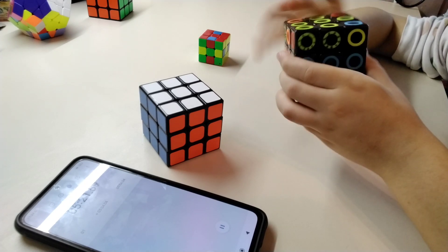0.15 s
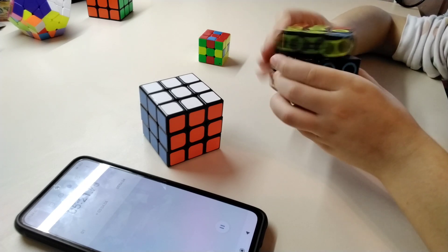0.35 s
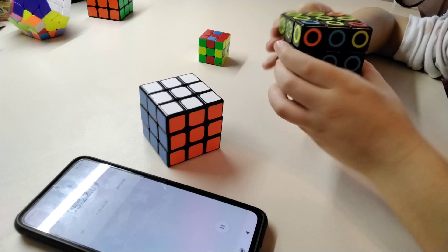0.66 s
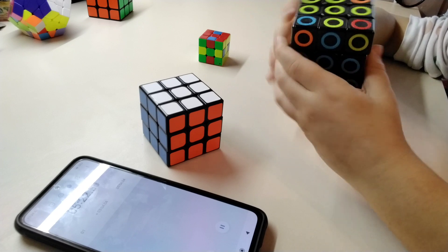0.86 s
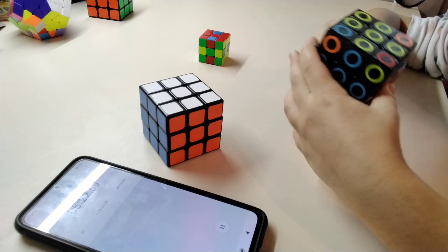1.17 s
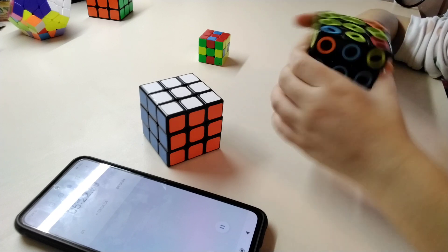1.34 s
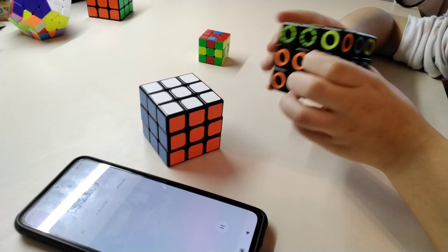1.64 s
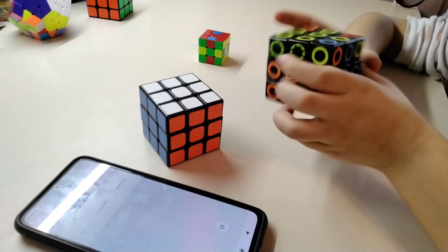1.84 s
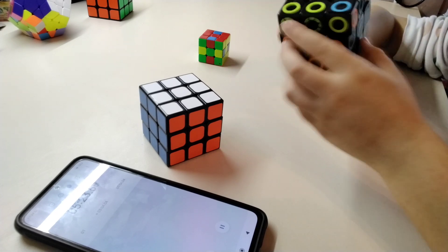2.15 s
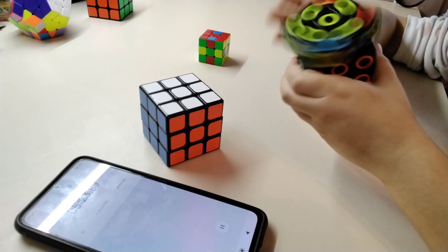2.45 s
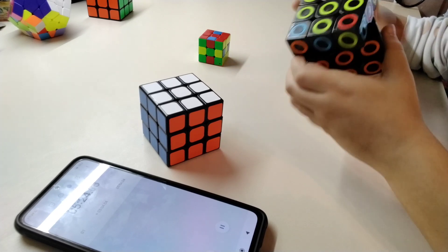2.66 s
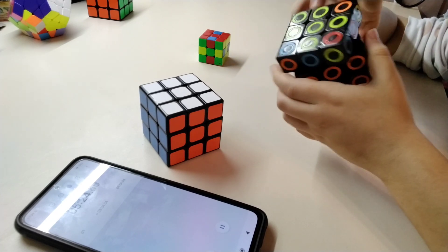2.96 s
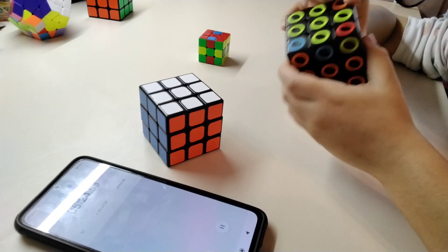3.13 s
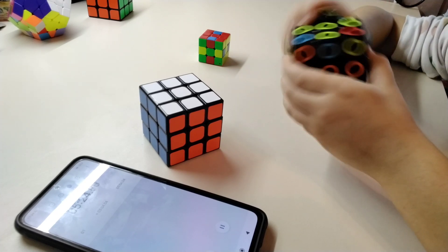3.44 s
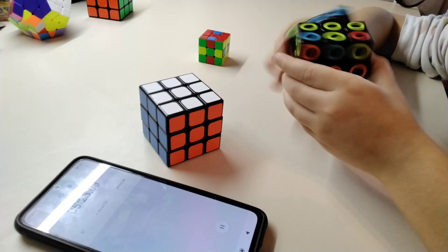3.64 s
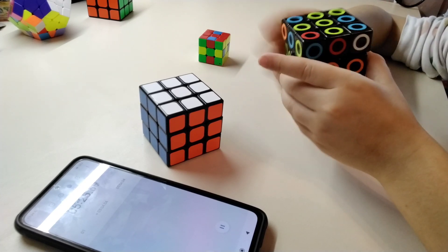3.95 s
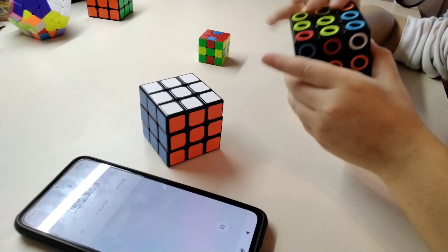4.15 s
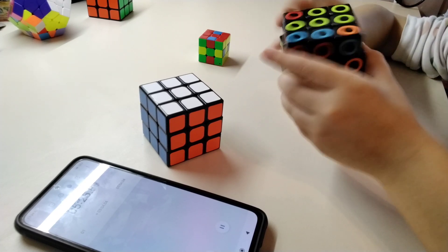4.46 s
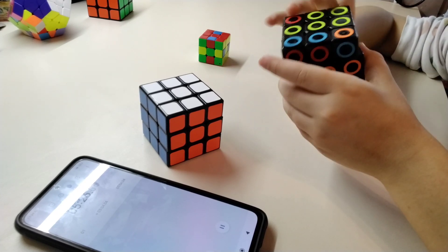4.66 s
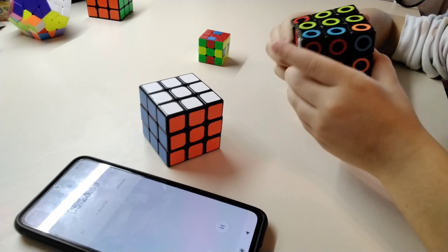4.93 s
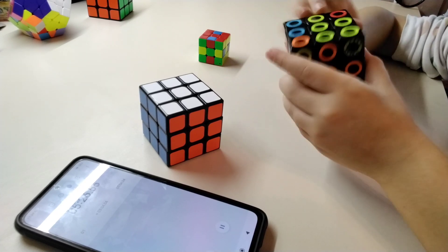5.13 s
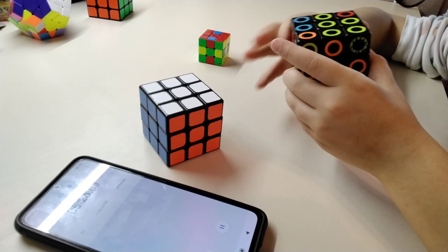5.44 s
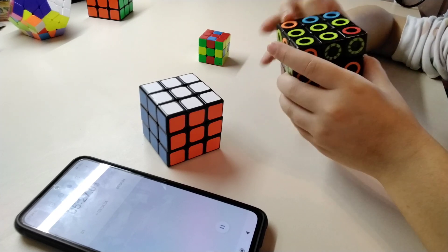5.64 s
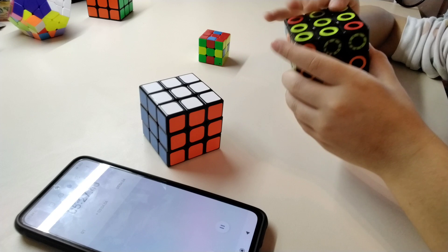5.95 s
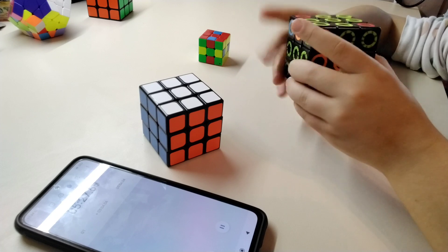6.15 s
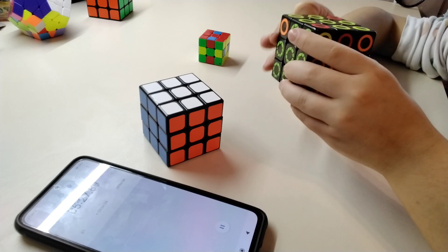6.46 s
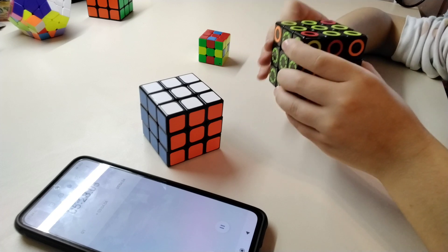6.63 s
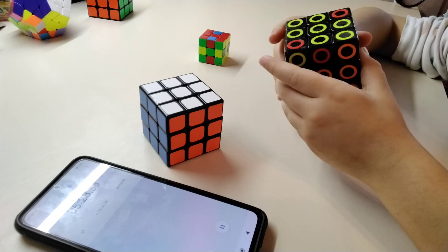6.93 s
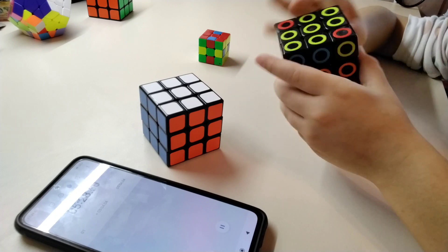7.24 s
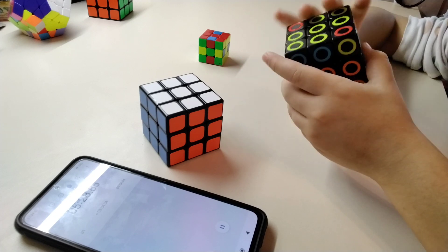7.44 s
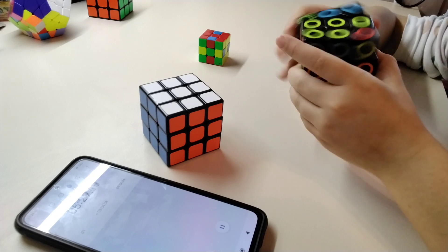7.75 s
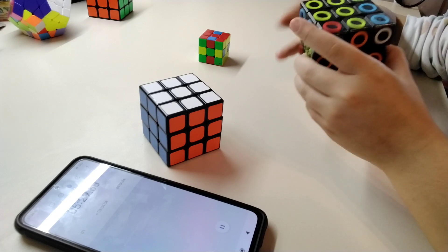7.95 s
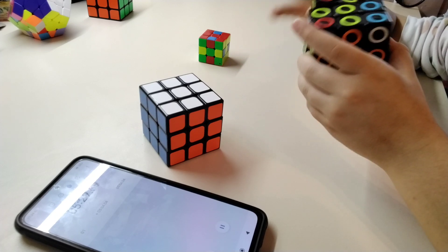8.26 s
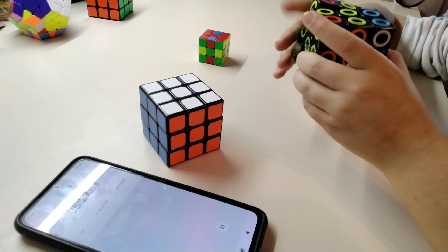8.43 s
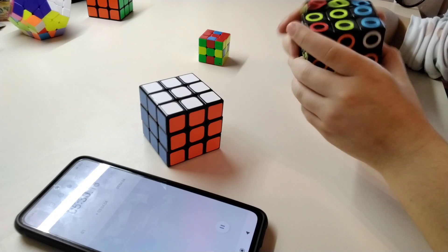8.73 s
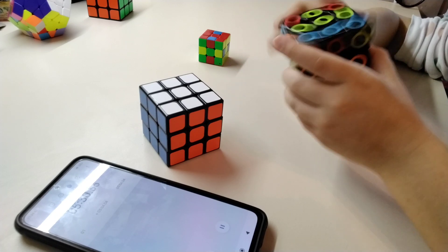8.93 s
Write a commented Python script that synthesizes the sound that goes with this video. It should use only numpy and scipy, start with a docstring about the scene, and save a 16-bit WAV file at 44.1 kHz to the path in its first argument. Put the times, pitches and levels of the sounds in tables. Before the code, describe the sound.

Short plastic clatters of a puzzle cube's layers sliding and snapping into place, with soft table bumps and a faint distant engine.

```python
"""Short plastic clatters: a puzzle cube is twisted by hand just above a table in a small quiet room.
Its layers slide, catch and snap home; impact and friction drive its cavities, walls and edges.
Dull bumps ring the table, and outside a distant engine slows down over road rumble and a faint hiss.
Two small microphone ports, each with its own treble resonance, colour the cube; the sound drops out once."""
import sys
import numpy as np
from scipy import signal
from scipy.fft import rfft, irfft
from scipy.io import wavfile
from scipy.ndimage import uniform_filter1d

SR = 44100
rng = np.random.default_rng(int(sys.argv[2]) if len(sys.argv) > 2 else 0)


def master(y):
    """Save y as 16-bit WAV."""
    cut = np.clip(np.atleast_2d(y).T, -1, 1)
    pcm = np.round(cut * 32767)  # scale
    wavfile.write(sys.argv[1], SR, pcm.astype(np.int16))


N = 400869


def cube():
    """Forced vibration: knocks and rubbing excite the resonances of three parts of the cube."""
    # air cavities, walls of the pieces, small edges: f/Hz, bandwidth/Hz, level/dB
    cavity_modes = [(417.9, 150, -2), (620, 140.6, 2.5), (1072, 250, -2)]
    wall_modes = [(1810, 1000, -9.5), (2210, 390, 0.5), (2930, 500, 0), (4162, 990, -0.5)]
    edge_modes = [(5482, 900, 0), (6240, 1380, 3), (7900, 2210, 4), (11130, 3700, 1), (13940, 6900, -8)]
    cavity, wall, edge = knocks() + sliding()
    return resonate(cavity, cavity_modes) + resonate(wall, wall_modes) + resonate(edge, edge_modes)


def knocks():
    """Impact excitation: a push and a dying burst of tiny collisions drive cavities, walls and edges."""
    # pieces knocking: t/s, strength/dB, cavity level/dB re strength, clatter T60/s
    impacts = [(0.0323, -53.5, 3, 0.0065), (0.0812, -53, -8, 0.036), (0.092, -20.5, -17.5, 0.022),
               (0.2956, -43.5, -13.5, 0.005), (0.3209, -31.5, -11, 0.029), (0.3404, -48, -9, 0.024),
               (0.3465, -28.5, -35, 0.021), (0.3536, -32.5, -9, 0.017), (0.377, -28, -29, 0.013),
               (0.4029, -23.5, -14.5, 0.026), (0.416, -22, -30, 0.0091), (0.8299, -46, -21, 0.0077),
               (0.9059, -42.5, -18, 0.0037), (1.0322, -34, -17, 0.012), (1.2327, -59.5, -8.5, 0.01),
               (1.77, -38, -18, 0.0098), (1.8664, -55, -10, 0.048), (1.889, -44.5, -36, 0.041),
               (1.9958, -59, -42, 0.034), (2.036, -53, -40, 0.016), (2.2546, -52.0, -25, 0.01),
               (2.3084, -41, -10.5, 0.0049), (2.3452, -51, -5, 0.016), (2.3658, -40.5, -12.0, 0.0089),
               (2.372, -36.5, -15.5, 0.016), (2.3966, -25.5, -17.5, 0.021), (2.4227, -19.0, -21, 0.018),
               (2.445, -13.5, -19, 0.012), (2.4523, -24.5, -26, 0.0094), (2.7665, -56, -14, 0.011),
               (2.892, -50, -21, 0.0063), (2.914, -59, -19, 0.014), (2.9955, -53.5, -12.5, 0.011),
               (3.0424, -35, -20.5, 0.013), (3.086, -51, -11.5, 0.026), (3.1415, -71, -11.0, 0.008),
               (3.235, -43.5, -15.0, 0.011), (3.3975, -67, -7, 0.014), (3.4038, -40, -10, 0.0072),
               (3.4102, -26.5, -20, 0.017), (3.435, -23, -17.5, 0.0088), (3.4556, -26.5, -17, 0.006),
               (3.4696, -24.5, -13, 0.0077), (3.5056, -33, -22, 0.0067), (3.5227, -53, -2, 0.019),
               (3.5842, -39, -11.5, 0.019), (3.617, -46, -6, 0.012), (3.6304, -38.5, -23, 0.023),
               (3.6417, -49, 1, 0.025), (3.652, -35, -14, 0.038), (3.664, -15, -15, 0.017),
               (3.6699, -31, -35, 0.011), (3.7872, -68, -7.0, 0.025), (3.8045, -65, -7.0, 0.015),
               (3.812, -52, -31, 0.043), (3.8191, -48, -23.0, 0.015), (3.8246, -45.5, -34, 0.0053),
               (3.9478, -52, -35, 0.0074), (3.9626, -56, -16, 0.021), (3.9858, -44.5, -15.5, 0.023),
               (4.0005, -37.5, -9, 0.024), (4.0137, -14.0, -25.0, 0.011), (4.0333, -29.5, -18, 0.03),
               (4.0816, -46.0, -13, 0.03), (4.3293, -40.0, -14, 0.01), (4.3505, -45.5, -13, 0.012),
               (4.3678, -53, -16, 0.027), (4.3819, -29, -18, 0.019), (4.3972, -15.5, -17.5, 0.011),
               (4.4148, -12.0, -30, 0.0061), (4.5825, -51, -38, 0.016), (4.7703, -44.5, -9, 0.015),
               (4.8068, -14.5, -17.5, 0.0058), (4.8381, -18.5, -22.5, 0.017), (4.8458, -25, -20.0, 0.01),
               (4.8628, -31.5, -13.5, 0.021), (4.952, -40.5, -13, 0.0085), (4.9705, -30.5, -17.5, 0.008),
               (4.9933, -46, -17, 0.023), (5.0025, -33.5, -5, 0.007), (5.0288, -15.5, -27, 0.021),
               (5.0422, -15.5, -13, 0.0092), (5.0552, -16.5, -20.5, 0.0056), (5.0625, -35, -38, 0.012),
               (5.1177, -38.5, -25, 0.009), (5.2011, -61.5, -13, 0.02), (5.2119, -62, -18, 0.008),
               (5.22, -56, -16.5, 0.012), (5.4645, -55.5, -6.5, 0.016), (5.4822, -35, -18, 0.06),
               (5.5448, -44.0, -23.0, 0.007), (5.6026, -46, -30, 0.008), (5.6128, -65, -24, 0.007),
               (5.6416, -34, -40, 0.013), (5.6538, -43, -14.5, 0.014), (5.742, -55.5, -30, 0.023),
               (5.7778, -63, -3, 0.011), (5.8104, -45.5, -14, 0.027), (5.8248, -32, -15.0, 0.029),
               (5.8609, -30, -15, 0.022), (5.8838, -32, -22, 0.013), (5.8902, -18.5, -26, 0.0049),
               (5.9796, -56.5, -2, 0.019), (6.2282, -52.5, -7.5, 0.012), (6.244, -51.5, -1.5, 0.023),
               (6.2515, -48, -8.0, 0.025), (6.2767, -52, 0, 0.012), (6.2825, -42.5, -6, 0.033),
               (6.3001, -31, -15.5, 0.016), (6.3047, -24.5, -17, 0.031), (6.3274, -29.5, -14.5, 0.02),
               (6.5373, -60.5, -27, 0.017), (6.562, -55.5, -27, 0.02), (6.5716, -57, -24, 0.026),
               (7.0079, -39.0, -11.5, 0.022), (7.121, -39, -12, 0.011), (7.1427, -39.5, -8.5, 0.018),
               (7.1574, -28, -11, 0.012), (7.1627, -40, -7, 0.015), (7.1746, -25.5, -30, 0.008),
               (7.1786, -34, -13, 0.035), (7.1936, -28, -13, 0.021), (7.485, -46, -10, 0.011),
               (7.5255, -43.5, -6, 0.028), (7.5363, -31.5, -10, 0.025), (7.5725, -26.5, -12, 0.02),
               (7.578, -25.5, -16.5, 0.016), (7.6058, -31, -17, 0.02), (7.691, -52, -24, 0.014),
               (7.6948, -49.5, -11, 0.021), (7.7242, -32.5, -19, 0.008), (7.7296, -29, -18.5, 0.012),
               (7.749, -28, -14.5, 0.019), (7.7618, -12.0, -24.5, 0.02), (7.7733, -23.5, -32, 0.019),
               (7.8147, -40, -15, 0.016), (7.8262, -34.5, -14, 0.019), (7.8963, -51.5, -19.0, 0.013),
               (8.012, -57.5, -33, 0.016), (8.0532, -64.5, -4.5, 0.013), (8.0725, -39.5, -13, 0.01),
               (8.087, -26.5, -16.5, 0.01), (8.1065, -16, -19.5, 0.023), (8.1122, -17, -22, 0.012),
               (8.1429, -23.5, -21.5, 0.0091), (8.2095, -52, -33, 0.011), (8.2236, -47, -25, 0.026),
               (8.2324, -48, -3.5, 0.018), (8.527, -39.0, -16, 0.0081), (8.597, -42, -9, 0.0078),
               (8.6252, -48, -12, 0.023), (8.695, -54.5, -9, 0.017), (8.7002, -51.5, -20, 0.044),
               (8.7201, -34, -17, 0.013), (8.7446, -37, -14.5, 0.0031), (8.8493, -46.0, -10.0, 0.011),
               (8.8635, -32.5, -15.5, 0.048), (8.8841, -8, -20.5, 0.015), (8.9059, -27, -21.0, 0.023),
               (9.0286, -47, -23.0, 0.009), (9.0503, -47.0, -21, 0.01)]
    size, rise_share, colour_spread = 2600, .038, .25
    t, drive = np.arange(size) / SR, np.zeros((3, N + size))
    for (start, strength_db, cavity_db, t60), chance in zip(impacts, rng.standard_normal((len(impacts), 3))):
        wall_db = -1 + .63 * cavity_db + 1.5 * chance[0]   # the clack follows the hollow knock
        rise = 1 - np.exp(-t / (rise_share * t60))
        burst = grains(size, spread_db=3.5) * from_db(-60 * t / t60) * rise
        burst /= np.sqrt(uniform_filter1d(burst ** 2, size=44).max())   # loudest millisecond at rms 1
        push = np.zeros(size)
        push[np.argmax(np.abs(burst))] = np.linalg.norm(burst)
        taps = np.array([1, *(colour_spread * chance[1:])])   # each contact is brighter or duller
        edge = signal.lfilter(taps / np.linalg.norm(taps), [1], burst)
        cavity = from_db(cavity_db) * (.73 * push + .5 * burst)
        wall = from_db(wall_db) * (.75 * push + .57 * burst)
        at = round(start * SR)
        drive[:, at:at + size] += from_db(strength_db) * np.array([cavity, wall, edge])
    return drive[:, :N]


def sliding():
    """Sliding friction: faces rub in clumped grains, growing louder as each slide gathers speed."""
    # layers and fingers sliding: start t/s, end t/s, level/dB
    slides = [(0.001, 0.036, -64.5), (0.287, 0.43, -60.5), (0.562, 0.708, -92.5), (1.216, 1.395, -88.5),
              (1.698, 2.01, -75.5), (2.018, 2.295, -82), (2.336, 2.462, -68), (2.885, 3.05, -80.5),
              (3.05, 3.154, -75.5), (3.167, 3.376, -83.5), (3.396, 3.53, -56.5), (3.595, 3.676, -59.5),
              (3.773, 3.846, -77), (3.944, 4.02, -60), (4.327, 4.41, -63.5), (4.6, 4.675, -76),
              (4.793, 4.847, -46), (4.95, 5.044, -59), (5.462, 5.658, -67), (5.722, 5.783, -83),
              (5.806, 5.876, -55), (6.235, 6.33, -59), (6.446, 6.6, -87), (7.122, 7.204, -54.5),
              (7.282, 7.349, -74), (7.515, 7.574, -52.5), (7.69, 7.78, -75), (8.051, 8.116, -64),
              (8.296, 8.5, -87.5), (8.58, 8.75, -75), (8.831, 8.873, -52), (9.024, 9.088, -71)]
    swell_db, ramp_s = 3.5, .0027
    t, envelope = np.arange(N) / SR, np.zeros(N)
    for start, end, rub_db in slides:
        on = slice(round(start * SR), round(end * SR))
        ramp = np.clip(np.minimum(t[on] - start, end - t[on]) / ramp_s, 0, 1)
        progress = (t[on] - start) / (end - start)
        envelope[on] += ramp * from_db(rub_db + swell_db * (progress - .5))
    rub = grains(N, spread_db=1.5) * envelope * from_db(4.6 * drift(60))
    return rub * from_db([[-14], [-10.5], [0]])   # cavities, walls, edges


def shifting_hands(x):
    """Room response depends on position: the moving cube cross-fades between a few places."""
    places, move_s = 3, .23
    position = np.arange(N) / SR / move_s
    out = 0
    for k in range(places):
        distance = np.abs((position - k + places / 2) % places - places / 2)
        share = np.clip(1 - distance, 0, 1)
        out = out + signal.fftconvolve((x * share)[None], room(), axes=1)[:, :N]
    return out


def room():
    """Stereo impulse response: direct sound, the table's reflection, then diffuse decay band by band."""
    # reverberation time: f/Hz, T60/s
    decay_times = [(200, 0.23), (1000, 0.23), (3000, 0.16), (8000, 0.19), (15000, 0.1)]
    reverb_db, echo_db, right_lag_s = -2, -5, .00014
    size = SR // 2
    t, hz = np.arange(size) / SR, np.fft.rfftfreq(size, 1 / SR)
    white, tail = rfft(rng.standard_normal((2, size))), 0
    near_scatter = from_db(11 - 60 * t / .025)   # off the hands and things on the table
    far_tail = from_db(-32.5 - 60 * t / .52)
    for centre_hz in np.geomspace(150, 16000, 10):
        band = np.exp(-(np.log2((hz + 1) / centre_hz) / .6) ** 2)
        decay = from_db(-60 * t / at_hz(decay_times, centre_hz))
        tail = tail + irfft(white * band, size) * (decay + near_scatter + far_tail)
    tail *= 1 - np.exp(-t / .0021)   # the walls answer a few ms late
    response = from_db(reverb_db) * tail / np.linalg.norm(tail, axis=1, keepdims=True)
    echo_s = .0006 * (1 + .35 * rng.uniform(-1, 1))   # varies with the cube's height
    for side, lag_s in enumerate([0, right_lag_s]):
        response[side, round(lag_s * SR)] += 1
        response[side, round((lag_s * 1.5 + echo_s) * SR)] += from_db(echo_db)
    return response


def ports(x):
    """Port resonance: each microphone opening is a minimum-phase filter, so nothing rings early."""
    # response of each port: f/Hz, gain/dB
    left = [(100, 2.5), (300, 0), (600, -1.5), (1000, 4.5), (2000, 7), (5000, 5), (6200, 4.5), (7200, 1),
            (9000, 10), (11000, 5.5), (16000, 7.5)]
    right = [(100, -1.5), (300, -5), (600, -1.5), (1000, 3.5), (2000, 7.5), (5000, 4.5), (6600, 7),
             (8000, 1), (9500, -7.5), (11500, -7.5), (16000, -0.5)]
    size = 1024
    hz = np.fft.rfftfreq(size, 1 / SR)
    cepstrum = irfft(np.log(from_db([at_hz(left, hz), at_hz(right, hz)])), size)
    cepstrum[:, 1:size // 2] *= 2   # fold onto positive time
    cepstrum[:, size // 2 + 1:] = 0
    response = irfft(np.exp(rfft(cepstrum)), size)
    return signal.fftconvolve(x, response, axes=1)[:, :N]


def table_bumps():
    """Damped free vibration: soft pushes set the low modes of the table ringing."""
    # table modes: f/Hz, level/dB, T60/s
    modes = [(100.95, 0, .2), (158, -10, 0.11), (213, -13.5, 0.087)]
    # pushes on the table: t/s, level/dB
    pushes = [(0.405, -55), (1.721, -58.5), (2.623, -41), (4.438, -49.5), (5.05, -52.5), (5.489, -50.5),
              (6.335, -55), (7.187, -63), (7.569, -58.5), (8.884, -49)]
    out, t = np.zeros(N + SR), np.arange(SR) / SR
    ring = sum(from_db(level_db - 60 * t / t60) * np.sin(2 * np.pi * hz * t) for hz, level_db, t60 in modes)
    rise = 1 - np.exp(-t / .0024)
    for start, level_db in pushes:
        at = round(start * SR)
        out[at:at + SR] += from_db(level_db) * rise * ring
    return out[:N] * from_db([[2], [-2]])   # louder on the left


def engine():
    """Periodic firing: a wavering tone and weak overtones sink with engine speed, over road rumble."""
    # engine slowing: t/s, firing f/Hz, tone level/dB, rumble level/dB
    course = [(0.0, 82.3, -73, -66), (0.6, 81.43, -79.5, -74.5), (1.39, 82, -79.5, -77.5),
              (2.25, 80.35, -67, -69), (2.83, 80.9, -73.5, -71), (3.34, 79.46, -64.5, -69),
              (3.8, 79.8, -69.5, -67), (4.3, 78.4, -63, -74.5), (5.19, 74.9, -67.5, -64),
              (5.8, 72.55, -70.5, -70), (6.18, 70.6, -70.5, -69), (6.76, 66.8, -54, -70),
              (7.19, 65.95, -49.5, -61), (7.69, 64.25, -57, -66), (7.98, 62.75, -67.5, -69),
              (8.43, 62.6, -55, -73.5), (8.78, 62.2, -64, -68), (9.09, 59.1, -87, -61.5)]
    # partials: multiple of the firing frequency, level/dB
    orders = [(1, -2.5), (1.5, -26.5), (2, -25.5), (2.5, -28.5)]
    # road rumble: f/Hz, relative spectral density/dB
    rumble_spectrum = [(13, -64.5), (22, -46), (48, -25), (70, -15.5), (85, -7.5), (103, -21.5), (225, -33),
                       (360, -27), (447, -53), (1200, -63.5), (1560, -93), (2640, -120)]
    firing_hz, tone_db, rumble_db = in_time(course)
    phase = 2 * np.pi * np.cumsum(firing_hz) / SR
    tone = sum(from_db(level_db + .48 * drift(3.3)) * np.sin(k * phase) for k, level_db in orders)
    rumble = from_db(rumble_db + 2.4 * drift(9.6)) * diffuse_noise(rumble_spectrum)
    return np.sqrt(2) * from_db(tone_db) * from_db([[.6], [-.6]]) * tone + rumble


def hiss():
    """Noise floor: room air and microphone self-noise make a steady broadband hiss."""
    # hiss: f/Hz, relative spectral density/dB
    spectrum = [(300, -26), (420, -10.5), (900, -16.5), (1160, -22), (1300, -16), (2300, -19),
                (3300, -24.5), (16000, -25)]
    return from_db(-80) * diffuse_noise(spectrum)


def diffuse_noise(spectrum):
    """Spatial coherence: stereo noise of rms 1, alike in the bass and unrelated in the treble."""
    # left-right likeness: f/Hz, coherence
    coherence = [(60, 0.7), (130, 0.97), (290, 0.65), (640, 0.27), (1400, 0.098), (3000, 0.02)]
    hz = np.fft.rfftfreq(N, 1 / SR)
    mid, side = rfft(rng.standard_normal((2, N)))
    alike = at_hz(coherence, hz)
    pair = np.sqrt(1 + alike) * mid + np.sqrt(1 - alike) * side * np.array([[1], [-1]])
    return rms_one(irfft(pair * from_db(at_hz(spectrum, hz)), N))


def resonate(x, modes):
    """Modal superposition: parallel resonators of alternating sign; white noise keeps its rms."""
    impulse, response = signal.unit_impulse(4096), 0
    for k, (hz, width_hz, level_db) in enumerate(modes):
        r = np.exp(-np.pi * width_hz / SR)
        feedback = [1, -2 * r * np.cos(2 * np.pi * hz / SR), r * r]
        ring = (1 - r * r) / 2 * signal.lfilter([1, 0, -1], feedback, impulse)
        response = response + (-1) ** k * from_db(level_db) * ring
    return signal.fftconvolve(x, response / np.linalg.norm(response))[:N]


def grains(size, spread_db):
    """Random impulses of uneven strength; rms 1."""
    return rms_one(rng.standard_normal(size) * from_db(spread_db * np.minimum(rng.exponential(1, size), 5)))


def drift(rate_hz):
    """Slow fluctuation: noise passed twice through a one-pole low-pass; rms 1."""
    hop, settle = 40, 2000
    r = np.exp(-2 * np.pi * rate_hz * hop / SR)
    slow = signal.lfilter([1], [1, -2 * r, r * r], rng.standard_normal(N // hop + settle + 2))[settle:]
    return np.interp(np.arange(N) / hop, np.arange(len(slow)), rms_one(slow))


def in_time(rows):
    times, *columns = np.transpose(rows)
    return [np.interp(np.arange(N) / SR, times, column) for column in columns]


def at_hz(points, hz):
    frequencies, values = np.transpose(points)
    return np.interp(np.log(hz + 1), np.log(frequencies), values)


def from_db(db):
    return 10 ** (np.asarray(db) / 20)


def rms_one(x):
    return x / np.sqrt(np.mean(x ** 2) + 1e-20)


def scene():
    """Superposition: the cube, heard through room and ports, adds to the background."""
    return ports(shifting_hands(cube())) + engine() + table_bumps() + hiss()


def record(dry):
    """Clipping and band limiting: the converter clips, loses a tenth of a second and cuts the top."""
    gap_start_s, gap_end_s, cutoff_hz = 5.245, 5.3525, 16300
    t = np.arange(N) / SR
    running = (t < gap_start_s) | (t > gap_end_s)
    low_pass = signal.cheby2(22, 60, cutoff_hz, fs=SR, output="sos")
    return signal.sosfilt(low_pass, np.clip(dry, -1, 1) * running)


dry = scene()
out = record(dry)
master(out)
```